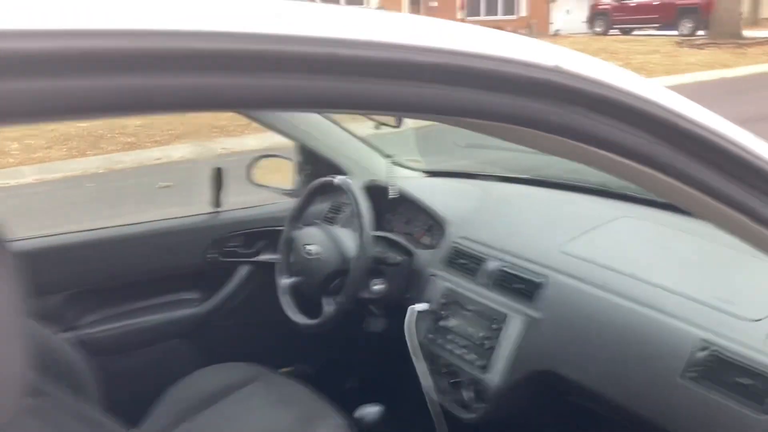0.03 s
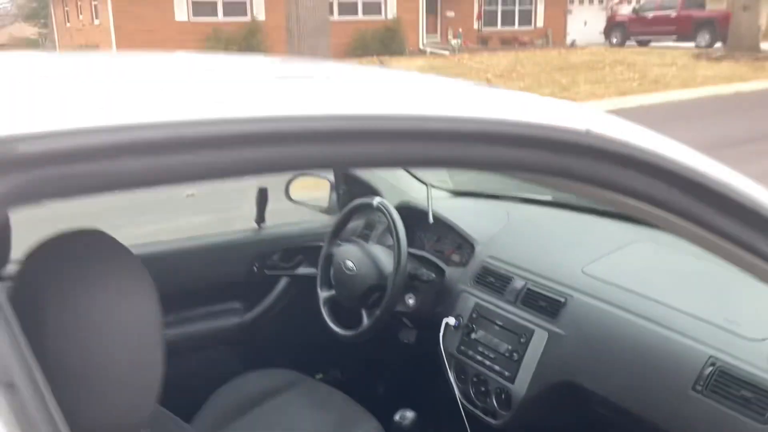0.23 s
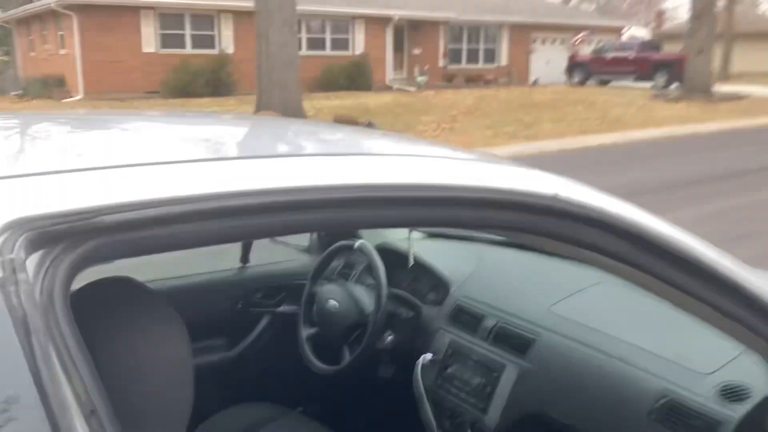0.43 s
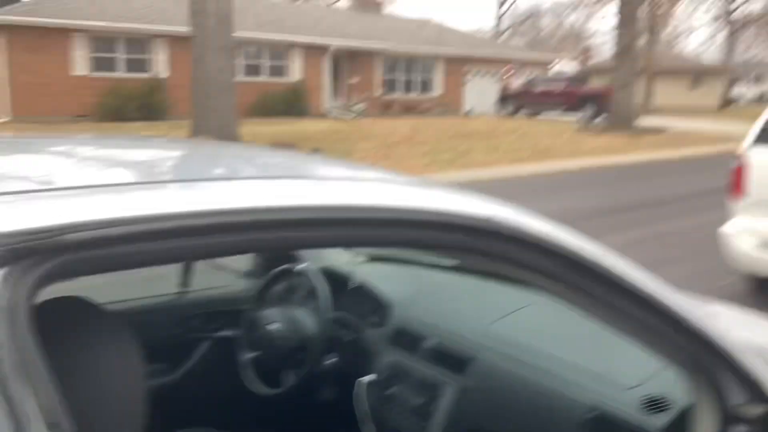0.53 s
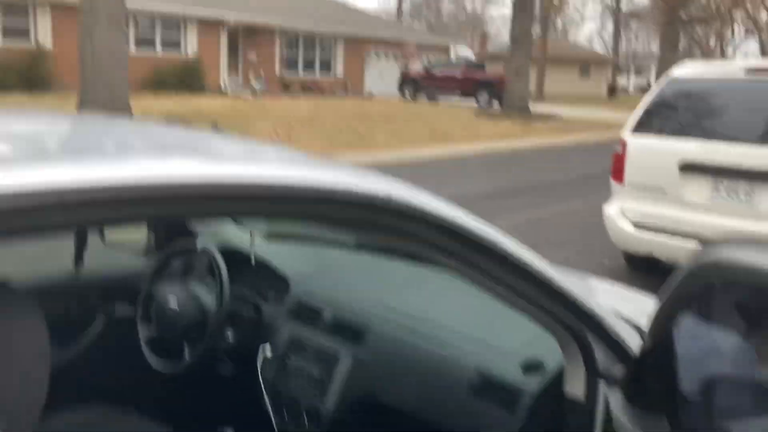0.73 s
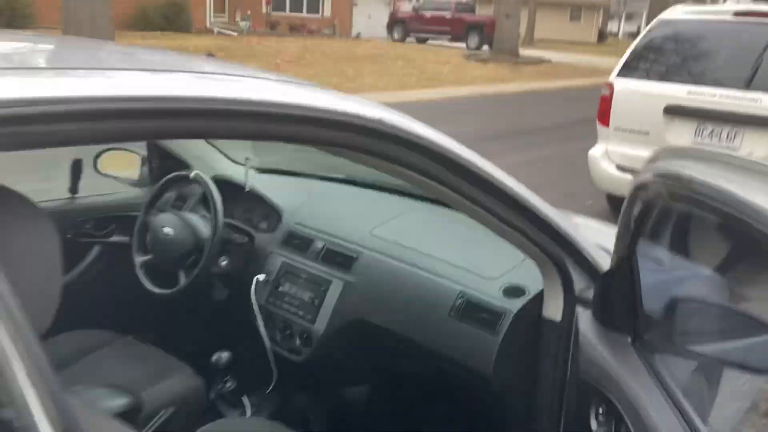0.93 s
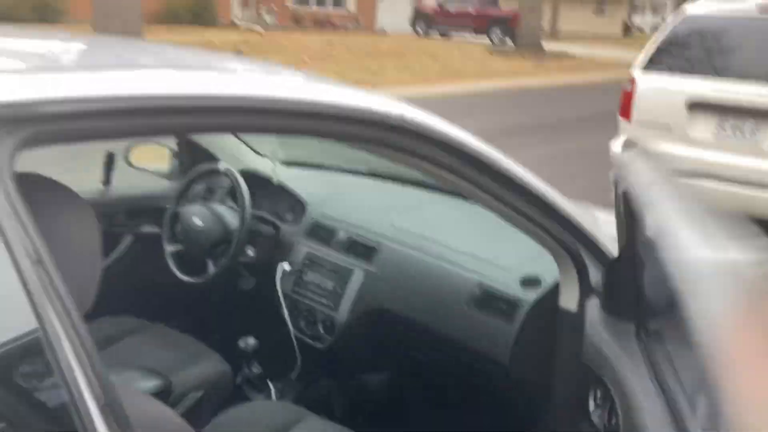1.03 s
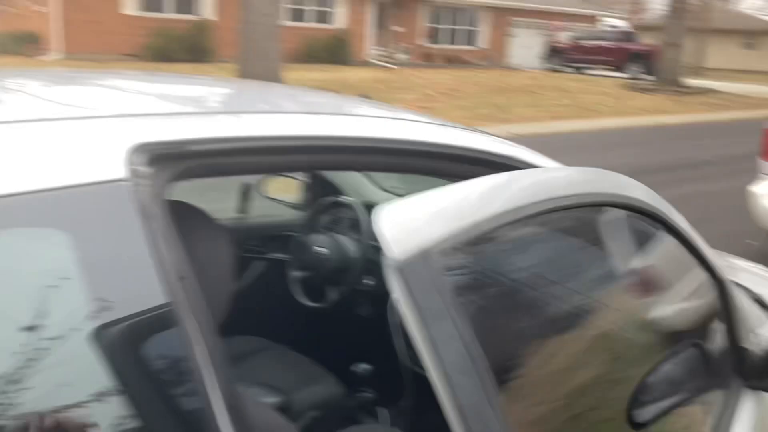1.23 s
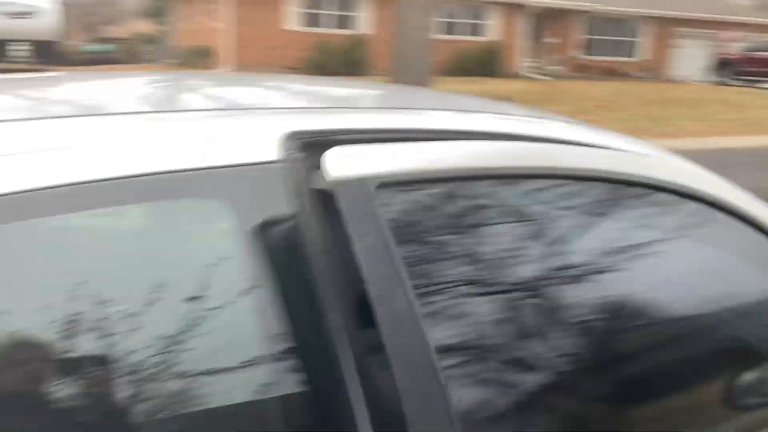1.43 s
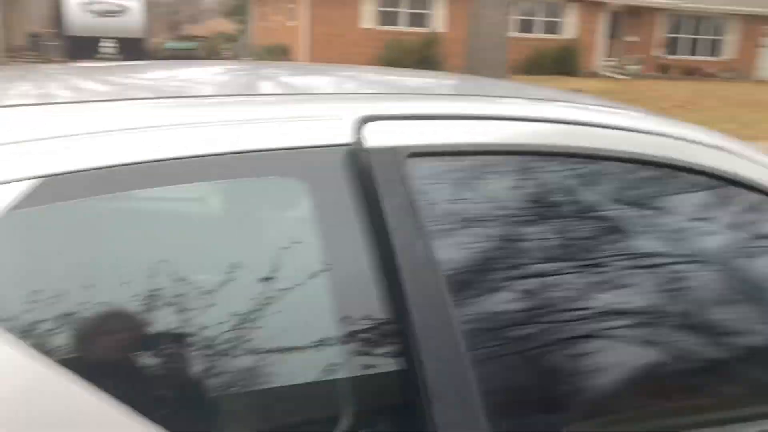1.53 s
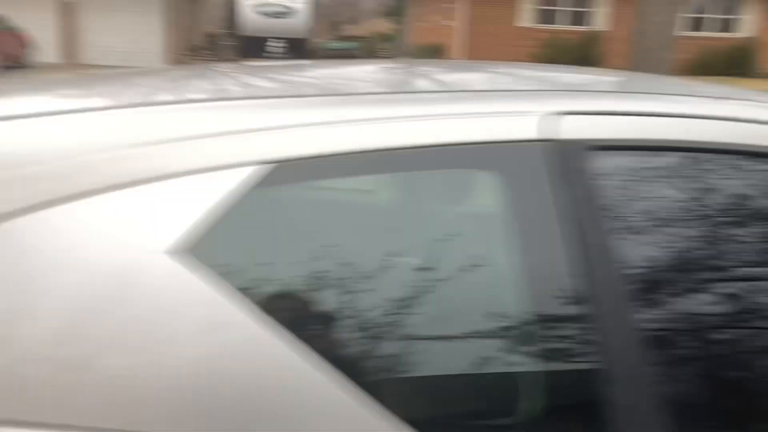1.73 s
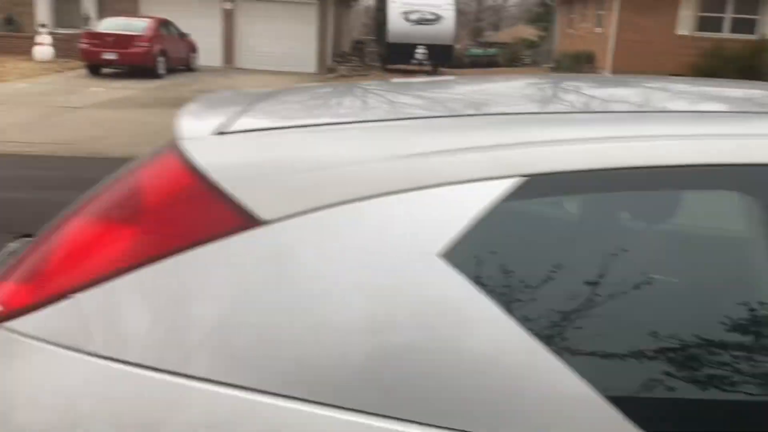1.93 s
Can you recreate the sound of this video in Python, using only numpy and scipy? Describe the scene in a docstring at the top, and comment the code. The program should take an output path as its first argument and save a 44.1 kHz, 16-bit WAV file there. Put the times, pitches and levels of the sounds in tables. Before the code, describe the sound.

A car door slams shut close by outdoors, latch clattering over a low body boom with a brief trim shudder; before it, wind rumbles on the microphone, with a small gritty shoe scuff.

```python
"""A car door shuts outdoors, close by: the latch clatters, the body booms and the trim shudders on.
Before that, gusty wind buffets the microphone over far hiss and leaves; a shoe scuffs, grit ticks,
a scrape glides upward and a sleeve rustles. Wind, hiss, rubs and cracks are shaped noise; the latch ring
and the body are damped modes; the scrape is a sine roughened by random curves."""
import sys
import numpy as np
from scipy import signal
from scipy.fft import rfft, irfft, next_fast_len
from scipy.io import wavfile
from scipy.ndimage import uniform_filter1d, map_coordinates

SR = 44100
rng = np.random.default_rng(int(sys.argv[2]) if len(sys.argv) > 2 else 0)


def unload_wav(signal):
    """Save mono or channel-first audio to the path in sys.argv[1] as 16-bit WAV at rate SR, clipped to [-1, 1]."""
    wavfile.write(
        sys.argv[1],
        SR,
        np.round(np.clip(np.atleast_2d(signal).T, -1, 1) * 32767).astype(np.int16),
    )


def decibels_to_gain(level_db):
    """Convert a level in decibels to a linear amplitude gain (20 dB per decade)."""
    exponent = np.asarray(level_db, float) / 20
    return 10 ** exponent


N = 88200
T = np.arange(N) / SR  # s

# Spectrum of the eddies before their tilt: f/Hz, relative level per Hz/dB
EDDY_SPECTRUM = [(120, -41), (200, 4), (452, -2), (1030, -18.5), (1580, -33), (1750, -36), (4000, -65.5),
                 (5200, -89), (8800, -120)]
# Spectrum of shoe, grit and sleeve before any tilt: f/Hz, relative level per Hz/dB
RUB_SPECTRUM = [(350, -44), (600, -14), (1320, -5), (4120, -4.5), (5910, -9.5), (7910, -2), (11200, 1.5),
                (15000, -4.5), (16500, -30)]
# Spectrum of seal and latch cracks before tilt and resonance: f/Hz, relative level per Hz/dB
CRACK_SPECTRUM = [(240, -21), (400, -11), (913, -6.5), (1330, -10), (4330, -15), (6000, -22), (7600, -17.5),
                  (11500, -17.5), (15000, -23.5), (16500, -56)]
# Pushes into the car body: t/s, level/dB, sign, contact time/s
BODY_PUSHES = [(1.573, -18, 1, 0.0057), (1.602, -11.5, 1, 0.0018), (1.612, -5.5, 1, 0.0041),
               (1.622, -4, -1, 0.00416), (1.634, -4, 1, 0.0023), (1.6429, -5.5, -1, 0.005),
               (1.648, -9, 1, 0.0067)]
# Latch contacts: t/s, ring level/dB, crack level/dB, crack hold/s, crack t60/s,
# crack brightness/dB per octave, loudest crack resonance/Hz
LATCH_CONTACTS = [(1.5832, -14.5, -20, 0.016, 0.028, -5.5, 3570),
                  (1.5964, -14.5, -17.5, 0.0053, 0.048, -0.3, 6800),
                  (1.606, -16, -18.5, 0.0059, 0.04, -5, 1850),
                  (1.6277, -23.5, -13.5, 0.006, 0.016, 4.5, 4420),
                  (1.636, -53, -24.5, 0.0049, 0.035, -2, 4180)]


def unit(x):
    """Scale to rms 1."""
    return x / np.sqrt(np.mean(x ** 2) + 1e-20)


def along(points, hz):
    """Interpolate (Hz, value) points on a log frequency axis."""
    f, v = np.transpose(points)
    return np.interp(np.log(hz + 1), np.log(f + 1), v)


def level_curve(points):
    """Gain over time from (s, dB) points."""
    return decibels_to_gain(np.interp(T, *np.transpose(points)))


def wobble(rate):
    """A smooth random curve, rate knots a second."""
    return map_coordinates(rng.standard_normal(int(N * rate / SR) + 4), [T * rate])


def filtered(x, response):
    """Multiply the spectrum of x by a complex response of frequency."""
    m = next_fast_len(N + 8192)
    return irfft(rfft(x, m) * response(np.fft.rfftfreq(m, 1 / SR)), m)[..., :N]


def noise(spectrum, tilt_db=0, pivot_hz=3000, peak_hz=None):
    """Coloured noise of rms 1, tilted in dB per octave, perhaps with one resonance."""
    def gain(hz):
        tilt = tilt_db * np.log2((hz + 30) / pivot_hz)
        bump = 0
        if peak_hz is not None:
            octaves = np.log2((hz + 1) / peak_hz)
            bump = 10 * np.exp(-.5 * (octaves / 0.078) ** 2)  # a narrow 10 dB peak
        return decibels_to_gain(along(spectrum, hz) + tilt + bump)
    return unit(filtered(rng.standard_normal(N), gain))


def burst(s, rise, hold, t60):
    """Envelope from time s: linear rise, hold, then exponential decay."""
    u = T - s
    decay = decibels_to_gain(-60 * np.clip(u - rise - hold, 0, None) / max(t60, 1e-3))
    return np.clip(u / max(rise, 1e-4), 0, 1) * decay


def wide(make):
    """Mid and an unrelated side; the bass under a moving edge is mono."""
    # How far down the sound stays wide: t/s, f/Hz
    wide_above = [(0, 85), (.19, 104), (.3, 215), (.43, 259), (.5, 396), (1.1, 510), (1.25, 460), (2, 415)]
    # Width by frequency: f/Hz, side over mid/dB
    side_level = [(60, -21), (700, -3), (2380, -1), (4400, 1), (8000, 2), (15000, -7.5)]
    hz, t, z = signal.stft(make(), SR, nperseg=1024)
    edge = np.interp(t, *np.transpose(wide_above))
    keep = decibels_to_gain(along(side_level, hz))[:, None] / (1 + (edge / (hz[:, None] + 1)) ** 14.6)
    side = signal.istft(z * keep, SR, nperseg=1024)[1][:N]
    mid = make()
    return np.array([mid + side, mid - side])


def even(x):
    """Noise with its slow chance swells pressed out by its own smoothed power."""
    span = int(0.11 * SR)
    power = np.abs(uniform_filter1d(uniform_filter1d(x ** 2, span), span))
    return x / np.sqrt(power + 0.017)


def gusts():
    """Wind pressure on the microphone: steady low rumble under lumpy, higher flutter."""
    # Gusts, then the wind behind the door slam: t/s, rumble level/dB, flutter level/dB
    early = [(0.0, -20.5, -27), (0.018, -36.5, -51), (0.038, -22.5, -36), (0.09, -34.5, -77),
             (0.172, -28, -41.5), (0.22, -27.5, -47), (0.246, -31, -46), (0.29, -32, -55),
             (0.321, -31.5, -31), (0.346, -26.5, -50.5), (0.377, -20, -33.5), (0.512, -19.5, -25),
             (0.63, -36, -21), (0.794, -35, -21.5), (0.876, -14.5, -24), (1.002, -19.5, -17.5),
             (1.034, -17, -17), (1.18, -27, -33.5), (1.198, -33, -47), (1.22, -25, -26), (1.354, -25, -38),
             (1.385, -23, -18.5), (1.468, -32.5, -53.5), (1.554, -43.5, -47), (1.56, -34, -38.5)]
    late = [(1.75, -27.5, -38.5), (1.85, -29.5, -45), (1.93, -28, -52), (2.0, -28.5, -35)]
    # Noise spectra: f/Hz, relative level per Hz/dB
    rumble_spectrum = [(12, -40), (25, -48), (40, 4.5), (55, 7.5), (80, 7.5), (130, -2), (200, -11),
                       (320, -20), (550, -83)]
    flutter_spectrum = [(65, -0.5), (110, 3.5), (412, -13), (482, -20), (686, -24.5), (1070, -46),
                        (1350, -50), (2500, -76), (3250, -89), (5500, -120)]
    s, rumble_db, flutter_db = np.transpose(early + late)
    rumble_level = decibels_to_gain(np.interp(T, s, rumble_db))
    lumps = unit(decibels_to_gain(2.27 * wobble(45.18) + 1.1 * wobble(90)))
    flutter_level = decibels_to_gain(np.interp(T, s, flutter_db)) * lumps
    return wide(lambda: rumble_level * even(noise(rumble_spectrum)) + flutter_level * noise(flutter_spectrum))


def street():
    """Far street hiss with a slow level, and leaves whose level stirs at random."""
    # Levels over time: t/s, level/dB
    hiss_level = [(0, -58), (.03, -53.5), (.55, -54), (.68, -56.5), (1.3, -53.5), (1.35, -56.5), (2, -56)]
    leaf_level = [(0, -65.5), (.2, -60), (.26, -56.5), (.4, -58), (.55, -53), (.66, -59.5), (1.2, -67.5),
                  (2, -65.5)]
    # Noise spectra: f/Hz, relative level per Hz/dB
    hiss_spectrum = [(290, -24), (500, 1.5), (1410, 0), (2100, -11), (3550, -7), (6000, -7.5), (8000, -1.5),
                     (11000, 0.5), (15000, -2), (16500, -34)]
    leaf_spectrum = [(530, -25), (900, -7.5), (1220, -6.5), (1750, -4), (2180, -5.5), (5700, -13.5),
                     (8000, -14.5), (10400, -64), (17600, -120)]
    far = level_curve(hiss_level)
    near = level_curve(leaf_level) * decibels_to_gain(0.75 * wobble(40.1))
    return wide(lambda: far * noise(hiss_spectrum) + near * noise(leaf_spectrum))


def eddies():
    """Small vortices that swell and burst on the ports as short puffs of noise."""
    # Puffs: peak t/s, level/dB, t60/s
    puff_list = [(0.033, -34.5, 0.034), (0.089, -40.5, 0.059), (0.427, -33, 0.038), (0.494, -27.5, 0.054),
                 (0.579, -22, 0.072), (0.617, -26, 0.022), (0.651, -32.5, 0.071), (0.702, -23.5, 0.23),
                 (0.761, -25.5, 0.3), (0.825, -20.5, 0.11), (0.846, -16.5, 0.078), (0.938, -20, 0.032),
                 (0.96, -20.5, 0.044), (0.998, -25, 0.12), (1.043, -22, 0.032), (1.075, -14, 0.046),
                 (1.114, -31, 0.043), (1.159, -35.5, 0.046), (1.235, -36, 0.044), (1.304, -26, 0.027),
                 (1.387, -22.5, 0.031)]
    rise = 0.0056  # s
    puffs = sum(decibels_to_gain(db) * burst(s - rise, rise, 0.0024, t60) for s, db, t60 in puff_list)
    return wide(lambda: puffs * noise(EDDY_SPECTRUM, -1.94, 500))


def rubs():
    """Shoe and sleeve rubbing: noise made grainy by a fast random level."""
    # Shoe scuff, then sleeve: t/s, level/dB, rise/s, hold/s, t60/s
    rub_list = [(.2112, -42, 0.0011, 0.022, 0.081), (1.179, -51, 0.035, 0.057, 0.044)]
    shape = sum(decibels_to_gain(db) * burst(s, rise, hold, t60) for s, db, rise, hold, t60 in rub_list)
    shape = shape * decibels_to_gain(2.4 * wobble(380))
    return wide(lambda: shape * noise(RUB_SPECTRUM))


def grit():
    """Grit ticking under the shoe: sharp noise bursts, each with its own brightness."""
    # Ticks: t/s, level/dB, t60/s, brightness/dB per octave
    tick_list = [(0.2129, -28, 0.032, 7), (0.2209, -27.5, 0.034, -2.5), (0.2282, -31.5, 0.016, -3.3),
                 (.2325, -37.5, .025, 0.5)]

    def make():
        return sum(decibels_to_gain(db) * burst(s, 0.00026, .0012, t60) * noise(RUB_SPECTRUM, tilt_db, 8000)
                   for s, db, t60, tilt_db in tick_list)
    return wide(make)


def scrape():
    """A scrape: a gliding and a steady resonance, smeared into bands by random curves."""
    # Gliding resonance, mostly rising: t/s, f/Hz, level/dB
    glide = [(.228, 880, -49), (.238, 950, -50), (.26, 1180, -55.5), (.29, 1400, -54), (.315, 1760, -62),
             (.35, 1810, -62), (.43, 1690, -62)]
    # Steady second resonance: t/s, level/dB, f/Hz, hold/s, t60/s
    upper_band = (.25, -55, 2100, .045, .1)
    s, hz, db = np.transpose(glide)
    phase = 2 * np.pi * np.cumsum(np.interp(T, s, hz)) / SR
    carrier = decibels_to_gain(np.interp(T, s, db, -120, -120)) * np.sqrt(2) * np.sin(phase)
    s, db, hz, hold, t60 = upper_band
    carrier = carrier + decibels_to_gain(db) * burst(s, .01, hold, t60) * np.sin(2 * np.pi * hz * T)
    # a narrow band and a broader halo; faster curves smear wider
    return wide(lambda: carrier * (wobble(260) + decibels_to_gain(2) * wobble(1100)))


def surges():
    """Slow vortices: a few cycles of one low pitch, alike on both ports."""
    # Surges: middle t/s, level/dB, f/Hz, length/s
    surge_list = [(.885, -12, 68, 0.034), (1.024, -11, 110, 0.034), (.52, -17.5, 60, 0.073),
                  (.322, -32, 420, 0.0097)]
    out = np.zeros(N)
    for s, db, hz, length in surge_list:
        swell = np.exp(-(2 * (T - s) / length) ** 2)
        out += decibels_to_gain(db) * swell * np.sin(2 * np.pi * hz * T + 1.7 * wobble(15.3))
    return out


def whips():
    """The fastest eddies, whipping up into the treble as brightly tilted noise."""
    # Whips: peak t/s, level/dB, rise/s, t60/s
    whip_list = [(.846, -24, 0.013, 0.013), (.704, -34.5, .006, 0.035), (1.041, -32, .005, 0.018)]
    shape = sum(decibels_to_gain(db) * burst(s - rise, rise, 0.0013, t60) for s, db, rise, t60 in whip_list)
    return wide(lambda: shape * noise(EDDY_SPECTRUM, 6, 500))


def seal():
    """Air squeezed out as the seal touches: a soft puff of noise."""
    # Puff: t/s, level/dB, rise/s, t60 before squaring/s, brightness/dB per octave
    squeeze = (1.553, -39, .028, .012, -3)
    s, db, rise, t60, tilt_db = squeeze
    return decibels_to_gain(db) * burst(s, rise, 0, t60) ** 2 * noise(CRACK_SPECTRUM, tilt_db)


def body():
    """Soft pushes in and out drive the car body's damped low modes."""
    # Body modes: f/Hz, relative level/dB, t60/s
    mode_list = [(56.12, -11, 0.58), (76, -17, 0.13), (96.2, -5, 0.56), (133.9, -10.5, 0.29),
                 (190, -7, 0.099), (221.1, -2.5, .2), (318.6, 8, 0.048), (362, 0.5, .15),
                 (445.6, -2.5, 0.13), (554, -0.5, 0.098)]
    force = np.zeros(N)
    for s, db, sign, width in BODY_PUSHES:
        push = np.sin(np.pi * np.clip((T - s) / width, 0, 1)) ** 2
        force += np.sign(sign) * decibels_to_gain(db) * push / (width * SR / 2)  # longer contact, same impulse
    response = sum(decibels_to_gain(db - 60 * T / t60) * np.sin(2 * np.pi * hz * T) for hz, db, t60 in mode_list)
    return decibels_to_gain(-3.5) * signal.fftconvolve(force, response)[:N]


def ring(s, modes, scatter_db):
    """Damped modes struck at time s, with scattered levels and wandering phase."""
    u = np.clip(T - s, 0, None)
    out = np.zeros(N)
    for hz, db, t60 in modes:
        decay = decibels_to_gain(db + scatter_db * rng.standard_normal() - 60 * u / t60)
        wander = 0.4 * hz / 1000 * wobble(70)  # 0.4 rad per kHz
        out += decay * np.sin(2 * np.pi * hz * u + wander)
    return out


def latch():
    """Each latch contact rings the metal's modes and cracks as grainy resonant noise."""
    # Latch modes: f/Hz, relative level/dB, t60/s
    latch_modes = [(792, -7.5, 0.077), (864, 0.5, 0.11), (1051, -7, 0.066), (1150, -17, 0.15),
                   (1566, -5, 0.05), (1730, -16, 0.071), (1865, -8, 0.052), (1985, -11, 0.062),
                   (2185, -15, 0.074), (2556, -11.5, 0.065), (3076, -7.5, 0.039), (3710, -23, 0.046),
                   (4320, -15, 0.035), (4600, -14, 0.039)]
    out = np.zeros(N)
    for s, ring_db, crack_db, hold, t60, tilt_db, peak_hz in LATCH_CONTACTS:
        onset = burst(s, 0.001, 9, 9)  # rises in 1 ms, then leaves the decay to the modes
        out += decibels_to_gain(ring_db) * onset * ring(s, latch_modes, 0.92)
        grains = decibels_to_gain(crack_db + 3.5 * wobble(600)) * burst(s, 0.00043, hold, t60)
        out += grains * noise(CRACK_SPECTRUM, tilt_db, peak_hz=peak_hz)
    return out


def boom():
    """Dense panel modes, too many to tell apart: low noise swelling from the second push."""
    # Noise spectrum: f/Hz, relative level per Hz/dB
    boom_spectrum = [(25, -33), (50, -0.5), (110, 3), (230, -9.5), (400, -18.5), (800, -48)]
    shape = burst(BODY_PUSHES[1][0], rise=0.034, hold=0.034, t60=0.51)
    return decibels_to_gain(-17.5) * shape * noise(boom_spectrum)


def shudder():
    """The trim shuddering on from the fourth latch contact: noise with an uneven level."""
    # Noise spectrum: f/Hz, relative level per Hz/dB
    shudder_spectrum = [(180, -15), (300, 2), (386, -4.5), (692, -10.5), (1700, -21.5), (4500, -35.5),
                        (7490, -45), (11000, -38), (15000, -43), (16500, -70)]
    shape = burst(LATCH_CONTACTS[-2][0], rise=0.0021, hold=0.0062, t60=0.31)
    return decibels_to_gain(-26) * shape * decibels_to_gain(4.5 * wobble(45)) * noise(shudder_spectrum)


def rattles():
    """Trim rattling on: short tones roughened by a random phase."""
    # Rattles: t/s, level/dB, f/Hz, t60/s
    rattle_list = [(1.6577, -36, 11000, 0.0065), (1.671, -48, 4400, .03), (1.704, -47, 1760, 0.072),
                   (1.741, -46.5, 1760, 0.032)]
    out = np.zeros(N)
    for s, db, hz, t60 in rattle_list:
        tone = np.sin(2 * np.pi * hz * T + 1.2 * wobble(330))
        out += decibels_to_gain(db) * burst(s, 0.00067, 0.00081, t60) * tone
    return out


def door():
    """The whole shutting door, its side made by shifting level and phase of the mid."""
    # Width by frequency: f/Hz, side over mid/dB
    side_level = [(60, -50), (110, -51), (200, -65), (380, -28), (700, -2), (1290, -10.5), (2380, -3.5),
                  (4400, -5.5), (8120, 2), (15000, -4.5)]
    # Phase of the side: f/Hz, lead/rad
    side_lead = [(300, 1.6), (2000, 1.27), (5000, 1.25), (9000, 1.6)]
    mid = seal() + body() + latch() + boom() + shudder() + rattles()
    side = filtered(mid, lambda hz: decibels_to_gain(along(side_level, hz)) * np.exp(1j * along(side_lead, hz)))
    return np.array([mid + side, mid - side])


def scene():
    """Wind and street air, the shoe and sleeve, and the door."""
    wind = gusts() + eddies() + surges() + whips()
    return wind + street() + rubs() + grit() + scrape() + door()


def dips(bands):
    """A response with flat-bottomed dips and soft edges."""
    def response(hz):
        edge_hz = 270
        db = sum(depth * (np.tanh((hz - lo) / edge_hz) - np.tanh((hz - hi) / edge_hz)) / 2
                 for lo, hi, depth in bands)
        return decibels_to_gain(db)
    return response


def band_limit(x):
    """A steep low-pass at the top of the band."""
    return signal.sosfilt(signal.butter(12, 17140, fs=SR, output="sos"), x)


def record(dry):
    """Low cut, soft clipping, then dark treble bands in mid and side."""
    # Bands that stay dark: low edge/Hz, high edge/Hz, gain/dB
    mid_dips = [(8414, 9680, -17.5), (12720, 14700, -25), (15320, 18000, -25)]
    side_dips = [(6500, 7600, -21), (11000, 12600, -5), (14600, 24000, -22)]
    low_cut_hz, clip_top, clip_hard = 31, 1, 2.2
    x = filtered(dry, lambda hz: (1j * hz / (low_cut_hz + 1j * hz)) ** 2)
    x = x / (1 + np.abs(x / clip_top) ** clip_hard) ** (1 / clip_hard)
    mid = filtered(x[0] + x[1], dips(mid_dips)) / 2
    side = filtered(x[0] - x[1], dips(side_dips)) / 2
    return band_limit(np.array([mid + side, mid - side]))


dry = scene()
out = record(dry)
unload_wav(out)
```